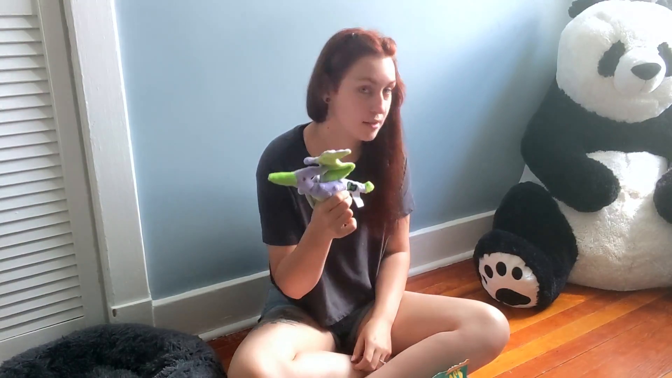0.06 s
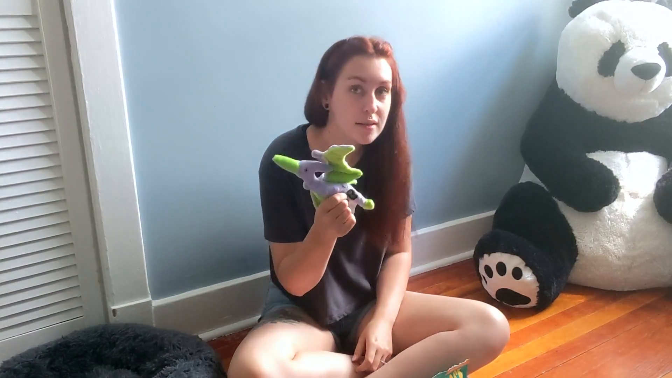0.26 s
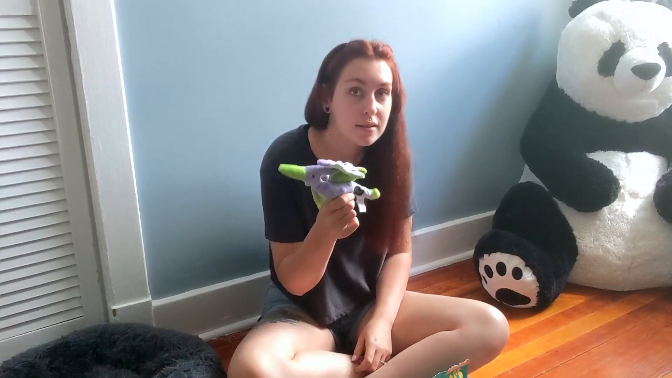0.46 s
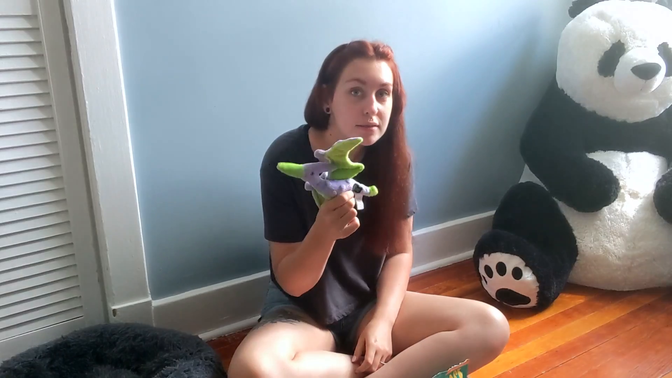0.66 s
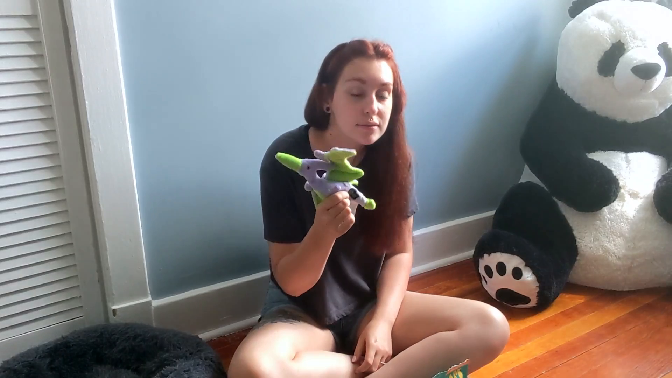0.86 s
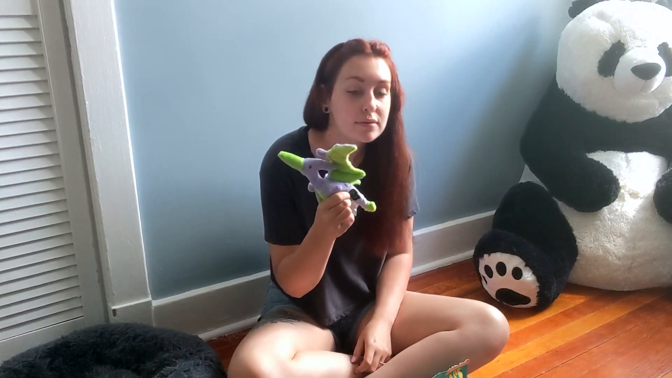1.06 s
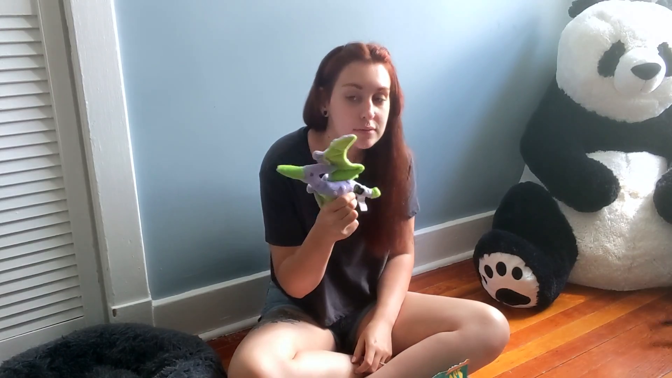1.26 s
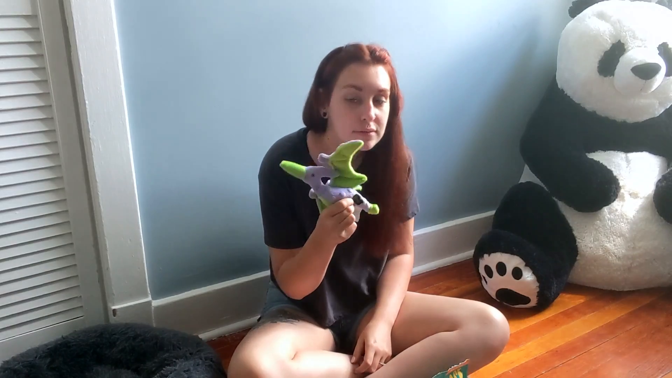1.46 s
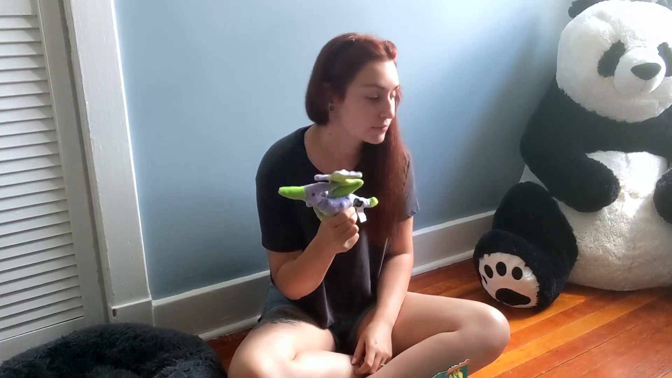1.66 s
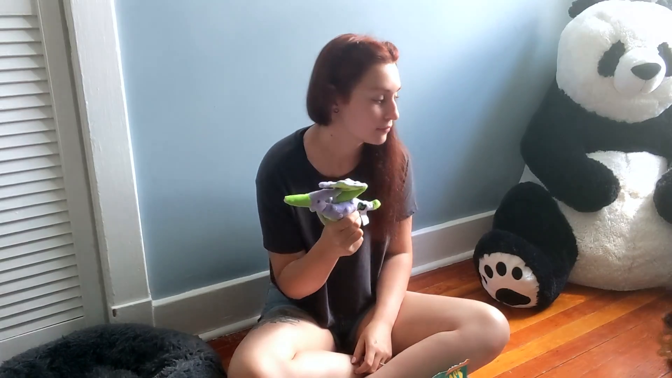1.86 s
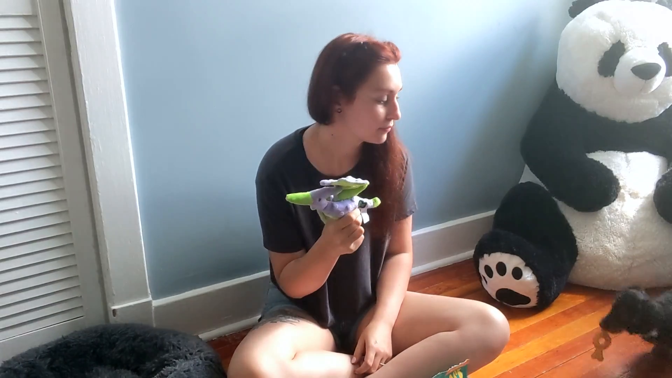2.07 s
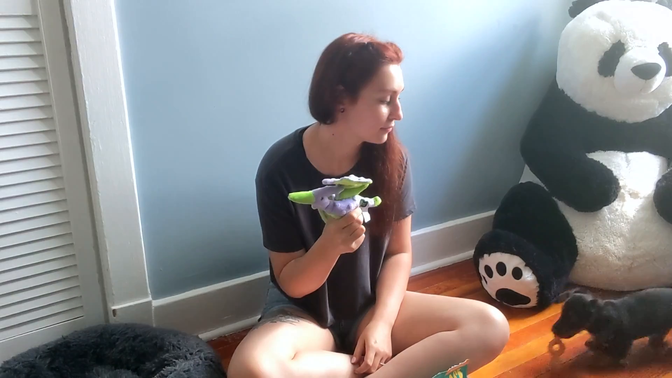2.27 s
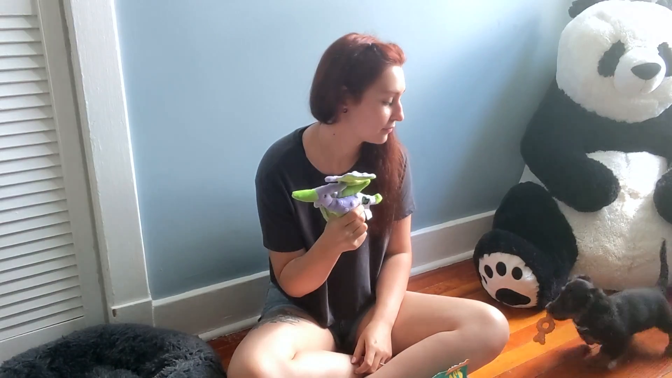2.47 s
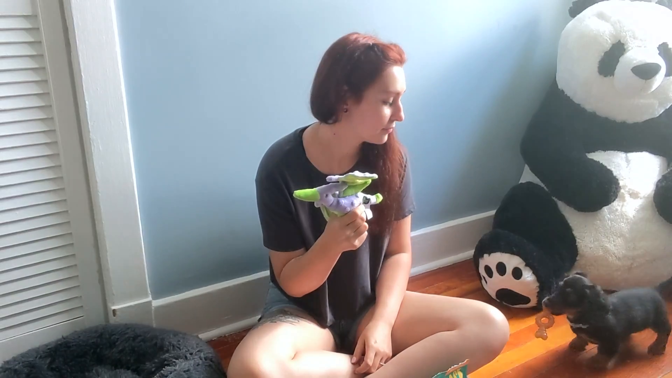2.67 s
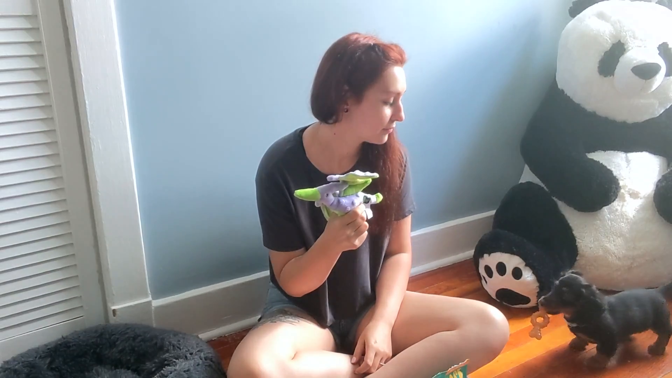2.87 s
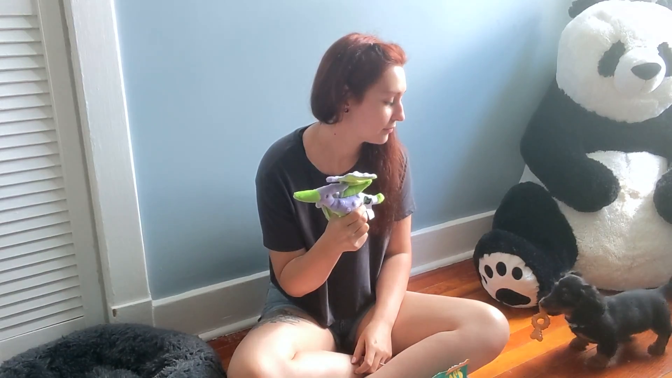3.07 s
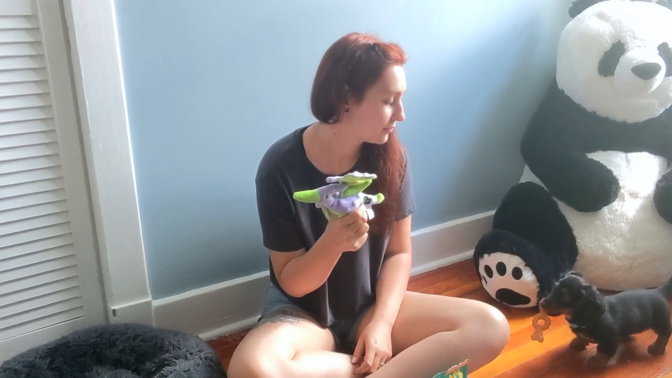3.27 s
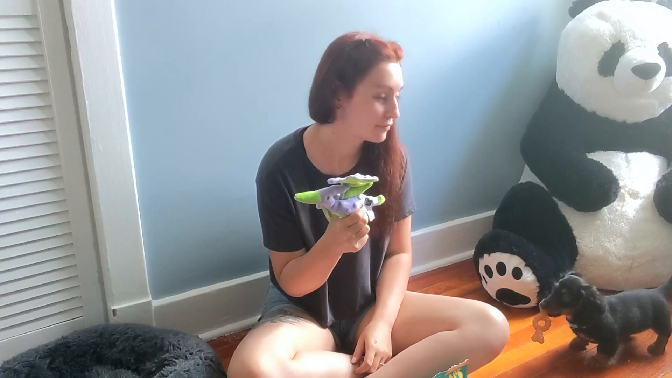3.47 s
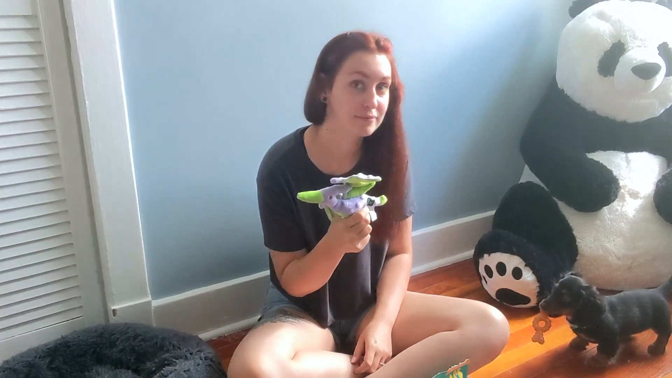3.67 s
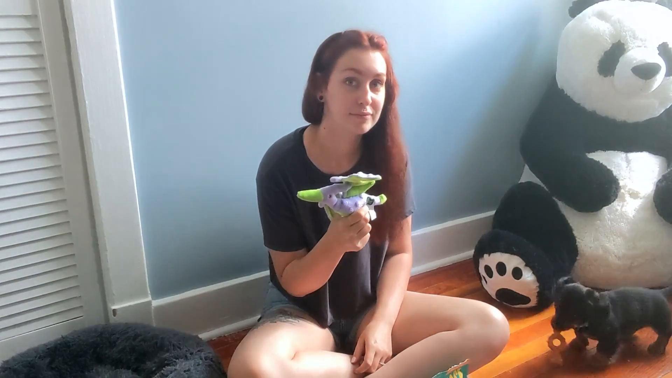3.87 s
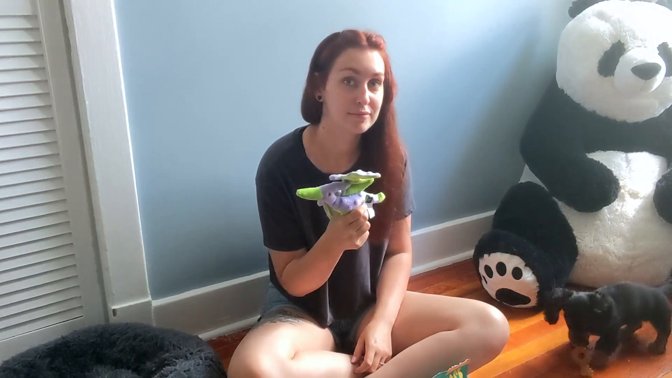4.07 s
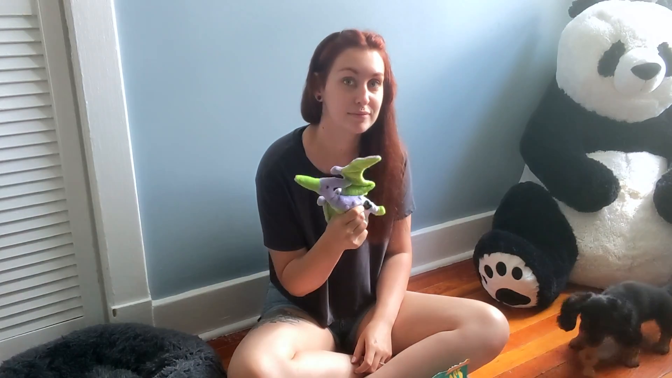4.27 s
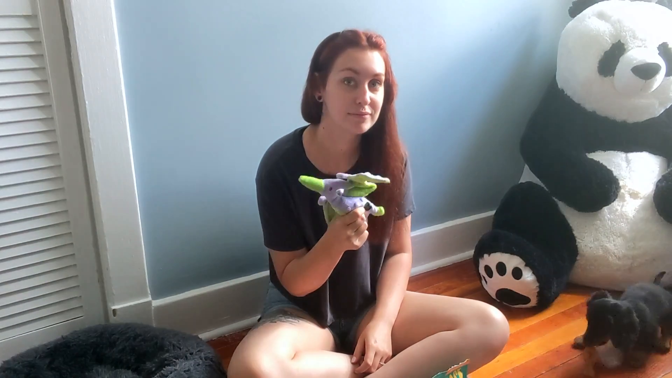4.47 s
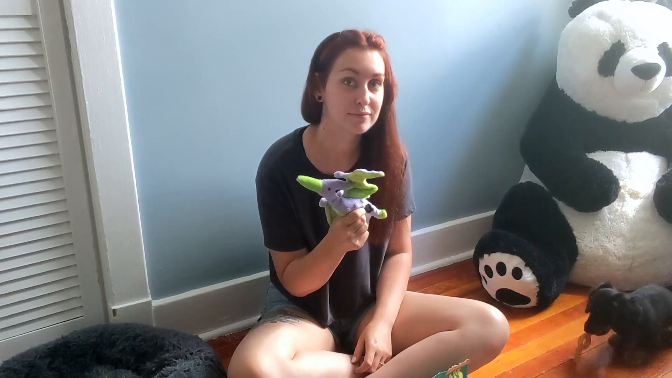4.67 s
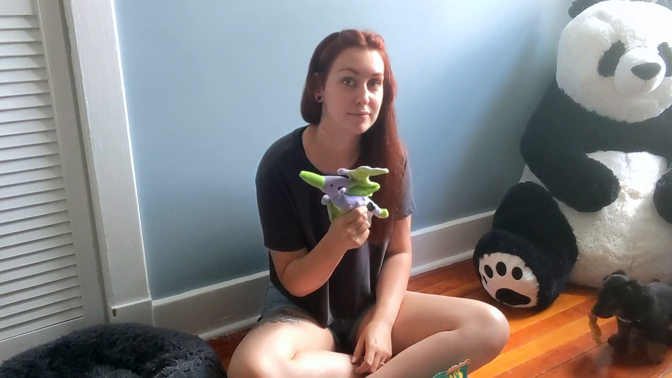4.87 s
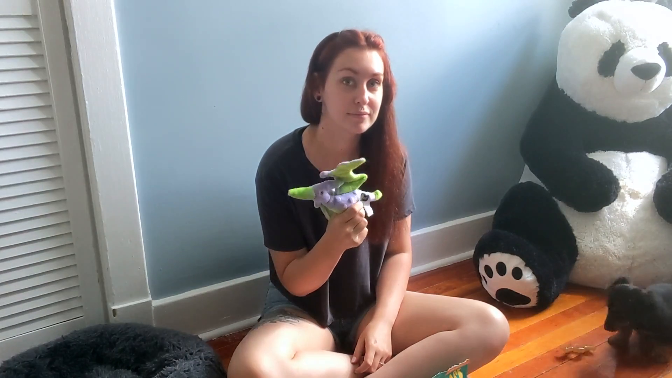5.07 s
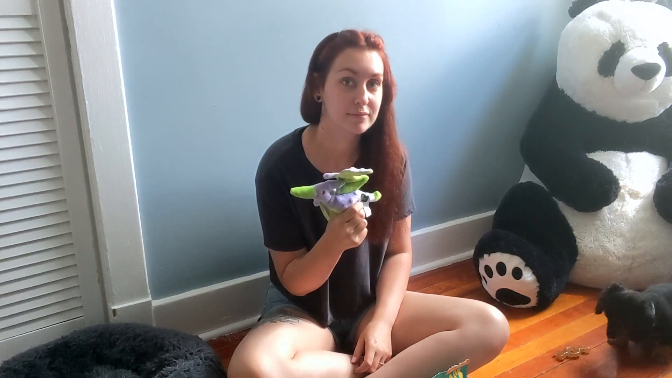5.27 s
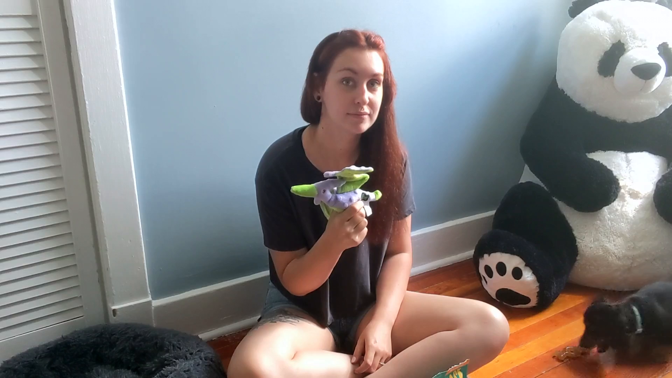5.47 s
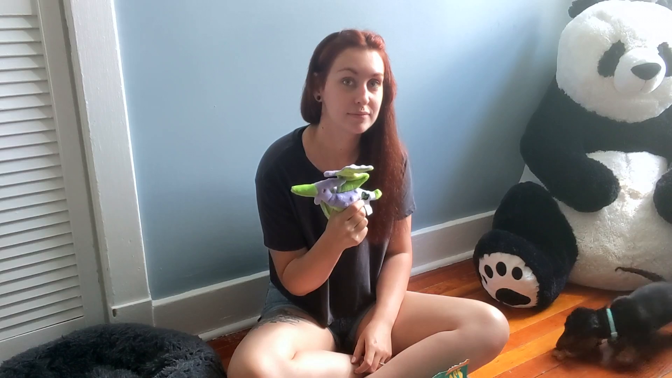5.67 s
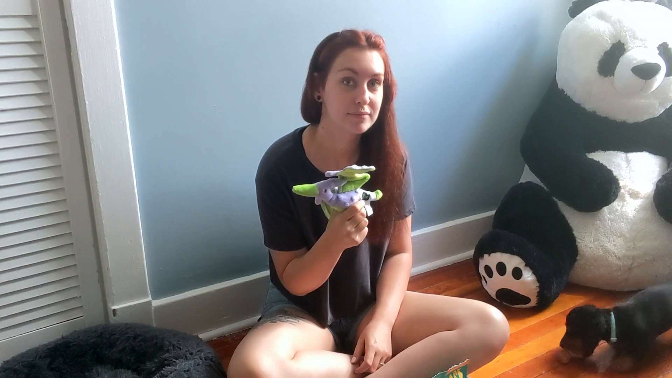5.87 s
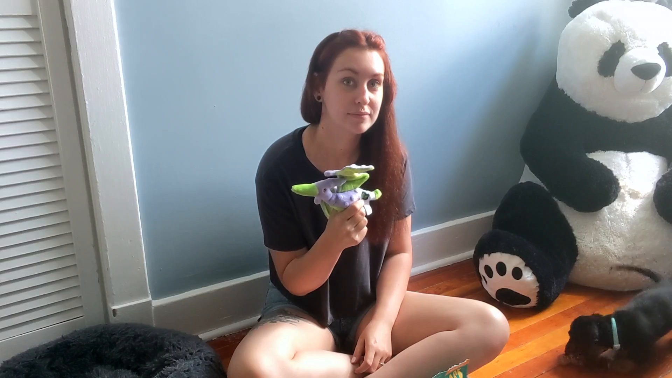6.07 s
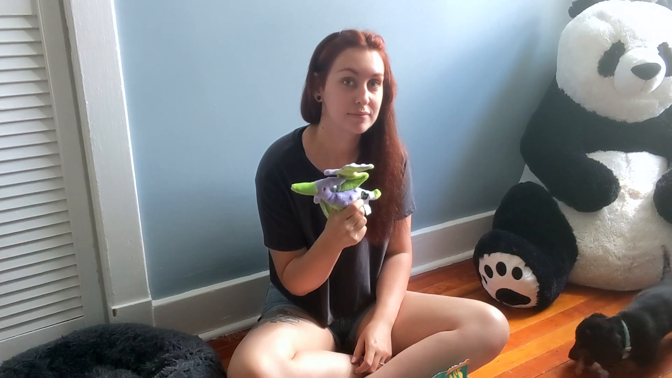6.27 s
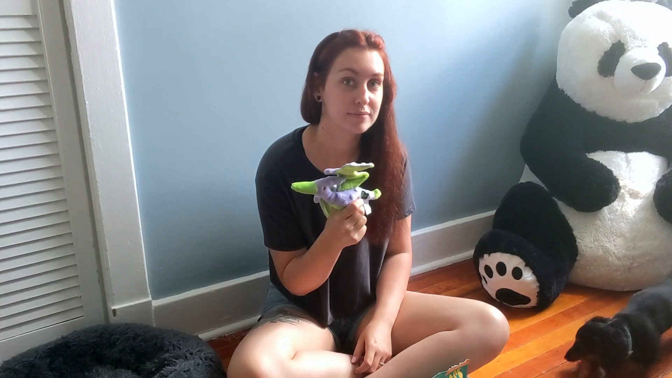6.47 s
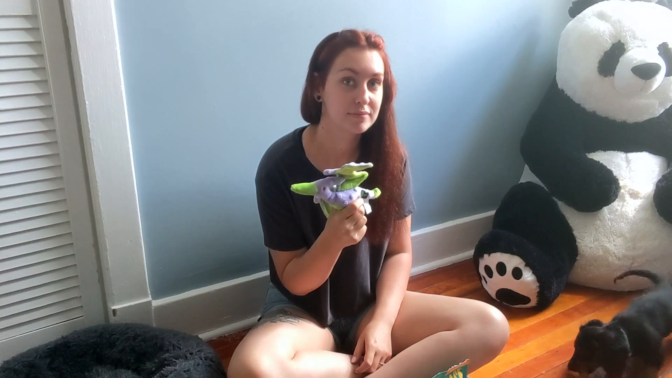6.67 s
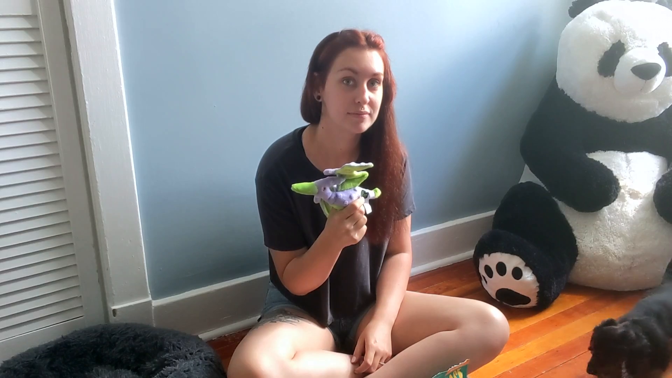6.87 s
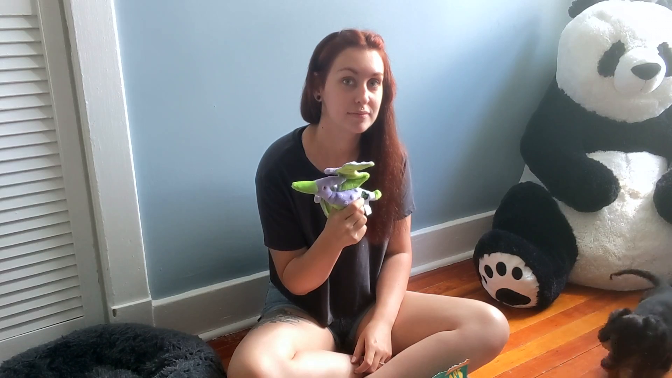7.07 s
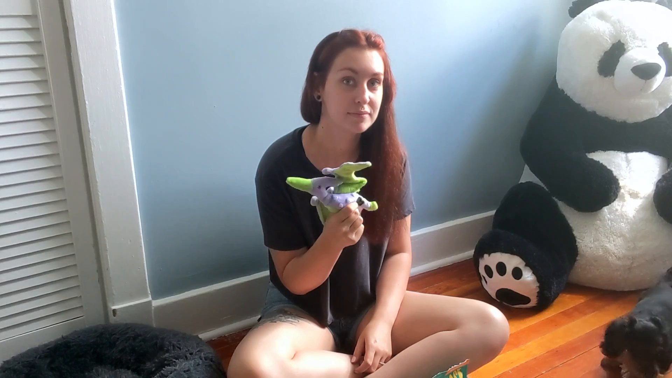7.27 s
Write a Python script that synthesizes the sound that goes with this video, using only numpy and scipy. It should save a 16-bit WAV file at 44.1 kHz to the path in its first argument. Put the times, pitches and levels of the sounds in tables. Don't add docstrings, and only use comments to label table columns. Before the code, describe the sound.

A low, slightly wavering motor drone with soft rumble and hiss fills a small, bare, briefly reverberant bedroom. From 0.2 to 1.6 s a plush toy close to the microphone gives five short, nasal, reedy squeaks about 0.3 s apart, each followed by a quieter, lower refill squeak. At 1.75 s faint puppy paws begin, with soft thumps, claw scuffs and a small metal clink around 2.2 s, then sparse ticks to 2.6 s. Quiet until a soft knock at 4.1 s. Four more squeaks run from 4.2 to 4.9 s, with lower refills between. At 5.0-5.4 s a rubber toy drops: the loudest event, hollow woody booms and hard bouncing knocks, the background briefly ducking. Lighter paw thuds and nudges follow from 5.7 to 6.9 s, with a bright tag clink at 6.6 s. One weak squeak at 7.3 s.

```python
import sys
import numpy as np
from scipy import signal
from scipy.fft import rfft, irfft, next_fast_len
from scipy.io import wavfile
from scipy.ndimage import uniform_filter1d, minimum_filter1d

SR = 44100
rng = np.random.default_rng(int(sys.argv[2]) if len(sys.argv) > 2 else 0)


def materialize(psi):
    bounded = np.clip(np.atleast_2d(psi).T, -1, 1)
    quanta = np.round(bounded * 32767).astype(np.int16)
    wavfile.write(sys.argv[1], SR, quanta)


def natural_amplitude(level_db):
    exponent = np.asarray(level_db, float) / 20
    return 10 ** exponent


N = 322371

# start in seconds, time the pressure is held in seconds,
# reed pitch in Hz at full pressure, pitch in Hz at the end of the hold, level in dB.
SQUEEZES = [
    (.186, .036, 1191, 1235, -25),
    (.504, .041, 1232, 1247, -23),
    (.779, 0.043, 1246, 1236, -23.5),
    (1.046, 0.041, 1202, 1229, -23),
    (1.347, 0.037, 1161, 1123, -24),
    (4.199, 0.039, 1141, 1068, -25),
    (4.444, .034, 1185, 1146, -23.5),
    (4.663, 0.038, 1140, 1073, -25.5),
    (4.891, .037, 1123, 1089, -25.5),
    (7.281, .03, 1070, 1080, -27),
]
# start in seconds, time the suction is held in seconds,
# reed pitch in Hz at full suction, pitch in Hz at the end of the hold, level in dB.
REFILLS = [
    (.369, .039, 902, 878, -33.5),
    (.665, 0.044, 879, 857, -33),
    (.947, 0.037, 887, 867.4, -30.5),
    (1.228, 0.043, 746, 764, -37),
    (1.540, 0.039, 814.4, 843, -30),
    (4.343, 0.032, 863.5, 873, -29.5),
    (4.568, 0.027, 854, 865.6, -31.5),
    (4.803, .032, 859, 874.6, -30),
]
# first pitch in Hz, first level in dB, rise in seconds, level change over the hold in dB,
# sag in seconds, pitch share and level in dB after the sag, pitch share and seconds of the collapse.
SQUEEZE_SHAPE = (1065, 1.5, .014, -3.5, .024, .8, -7, .7, .011)
REFILL_SHAPE = (915, -5, 0.0042, 2, .021, .8, -7, .75, .011)
# frequency in Hz, level in dB.
SQUEEZE_COLOUR = [
    [(530, -30.5), (900, -4), (1260, -4.5), (1760, -3), (2530, -6.5), (2960, -7), (3760, -12.5),
     (4090, -6.5), (4840, -8), (7920, -8), (9950, 1.5), (12200, -20), (15900, -22)],
    [(530, -34), (900, -9.5), (1140, -1.5), (1470, -3.5), (2220, -7), (2780, -5), (3220, -8.5), (5140, -9),
     (6460, -6), (7110, -10), (9830, 1.5), (13000, -24), (15900, -22)],
]
REFILL_COLOUR = [
    [(410, -32), (700, -3), (1680, 4), (2550, -1.5), (3630, -7.5), (4420, -7.5), (5660, -11.5),
     (7550, -19.5), (9310, 2), (9930, 2), (11800, -8.5), (14700, -22), (15900, -45)],
    [(410, -32), (700, -13), (1790, -3), (2690, -15), (3630, -19.5), (4660, -23), (5310, -21), (6980, -35),
     (9680, -8.5), (12200, -25), (12900, -32.5), (14900, -28), (15900, -88)],
]
# start in seconds, peak in dB,
# pitch of the boom in Hz.
PAWS = [(1.748, -27, 210), (2, -34, 160), (2.159, -28.5, 156), (2.186, -26, 170), (2.222, -36, 155),
        (2.24, -30.5, 380), (4.139, -30.5, 144), (5.102, -5, 250), (5.117, -3.5, 237), (5.175, -23, 251),
        (5.332, -15, 204), (5.666, -24.5, 239), (5.683, -21, 270), (5.79, -41, 185), (6.014, -15, 203),
        (6.18, -19.5, 221), (6.358, -29, 207), (6.571, -23, 315), (6.639, -33, 151), (6.88, -36.5, 199)]
# start in seconds, peak in dB,
# hard knock in dB over that peak, pitch of the boom in Hz.
BOUNCES = [(4.115, -29.5, -11.5, 242), (5.011, -5.5, -18, 259), (5.039, -12.5, -22, 232),
           (5.099, -1, -11, 640), (5.153, -17, -5, 262), (5.218, -25, -9, 222), (5.251, -28, -5, 490),
           (5.257, -14, -10, 322), (5.314, -12.5, -10.5, 424), (5.362, -23.5, -30, 238),
           (5.723, -28.5, -13, 500), (5.758, -27, -20, 185), (5.847, -45, -20, 235), (6.0, -14, -9.5, 260),
           (6.058, -17, -5.5, 300), (6.088, -20, -8, 248), (6.219, -26, -15, 225), (6.283, -23, -11, 340),
           (6.535, -24.5, -8, 234), (6.608, -27.5, -12, 241)]
# frequency in Hz, level in dB.
KNOCK_COLOUR = [(320, -26.5), (550, 1), (651, 4.5), (771, 0.5), (1740, -9), (4000, -30), (7980, -46),
                (9850, -45), (15900, -104)]
# frequency in Hz, level in dB, 60 dB decay in seconds.
JOISTS = [(150.7, -2.5, 0.51), (237.6, 4, 0.25)]
# start in
# seconds, peak in dB, low and high edge in Hz, length in seconds.
SCUFFS = [(1.741, -60, 5000, 15500, .15), (1.947, -54.5, 9530, 14300, .004),
          (1.995, -44, 4460, 13000, 0.0095), (2.007, -47, 3570, 9400, 0.019),
          (2.135, -42.5, 1263, 16000, .015), (2.204, -47.5, 4900, 16000, .01),
          (2.223, -35.5, 390, 7200, 0.0048), (2.258, -42.5, 4960, 13900, 0.025),
          (2.478, -46, 1920, 16000, .012), (2.63, -51.5, 2460, 15700, 0.0084),
          (3.783, -49.5, 6450, 10980, 0.00067), (5.09, -33, 2450, 12040, 0.022),
          (5.098, -23.5, 900, 5470, 0.0016), (5.254, -43, 1497, 6000, 0.00089),
          (5.312, -44, 1004, 5960, 0.00076), (5.609, -52, 3700, 15000, 0.014),
          (5.791, -49, 2460, 12000, 0.0089), (6, -56, 2500, 11000, 0.01), (6.067, -62, 4000, 13000, .025),
          (6.162, -57, 3930, 11300, 0.011), (6.335, -49, 6500, 11500, 0.00067),
          (6.495, -58, 4000, 10000, 0.0068), (6.53, -53, 2880, 8540, .01),
          (6.594, -55.5, 5340, 9700, 0.0099)]
# start in seconds, peak in dB.
CLINKS = [
    (2.21, -28),
    (6.5321, -64),
    (6.5985, -23.5),
]
# frequency in Hz, level in dB, 60 dB decay in seconds.
TAG_MODES = [(5600, 10, 0.025), (5650, 2, .04), (6300, -7, 0.032), (6180, 9, 0.036), (7600, -4, 0.053),
             (8800, -27, 0.037)]
# delay after the straight path in seconds, level in dB.
ECHOES = [(.0024, -7.5), (.0052, -3), (.0087, -13.5)]
# frequency in Hz, 60 dB decay in seconds.
ROOM_T60 = [(125, 0.27), (500, 0.26), (1200, 0.2), (2500, 0.28), (5000, 0.23), (9500, 0.23), (14000, 0.15)]
# frequency in Hz, left minus right in dB.
TOY_BALANCE = [(60, -15.5), (110, -29.5), (200, -22), (380, 2.5), (700, 5), (1290, -3), (2380, -2.5),
               (4400, -1.5), (8120, -10.5), (15000, 7)]
FLOOR_BALANCE = [(60, 1), (110, 0), (200, 1), (380, 1.5), (700, -1), (1290, -0.5), (2380, 0), (4400, -3),
                 (8120, -7), (15000, 5.5)]
# frequency in Hz, level in dB rms.
DRONE = [(59.2, -44), (145.3, -57), (360.7, -64), (409.1, -69.5)]
# frequency in Hz, level in dB per Hz.
AIR_COLOUR = [(41, -22.5), (70, -11.5), (103, -13.5), (155, -8), (313, -19), (367, -21), (605, -26),
              (759, -25.5), (1170, -30.5), (1720, -31), (2010, -35), (4670, -40), (8420, -47.5),
              (14200, -43.5), (15900, -47.5)]
# frequency in Hz, left-right likeness from -1 to 1.
AIR_ALIKE = [(60, 0.78), (130, 0.89), (290, 0.8), (640, 0.18), (1410, -0.28), (3100, 0.073), (6820, 0.017),
             (15000, -0.1)]
# frequency in Hz, left minus right in dB.
AIR_BALANCE = [(60, -3.5), (110, -7.5), (200, -1), (380, -3.5), (700, 3.5), (1290, -1.0), (2380, -2),
               (4400, -1.5), (8120, -7.5), (15000, 14.5)]

T = np.arange(N) / SR
PAD = next_fast_len(N + 4096)
HZ = np.maximum(np.arange(PAD // 2 + 1) * SR / PAD, 1)
LEFT_RIGHT = np.array([[1], [-1]])
STEP = 16


def squeaker(squeaks, colours, shape):
    out = np.zeros(N)
    for squeak in squeaks:
        s, hz, db = pressure(squeak, shape)
        tone = colours[int(3 < s[0] < 6)]
        t = s[0] + T[:int((s[-1] - s[0]) * SR)]
        age = t - s[0]
        ragged = np.clip(age / 0.01, .1, 1)

        waver = smooth_noise(SR // 8, 90, 1)[:len(t)]
        hz = uniform_filter1d(np.interp(t, s, hz), 132)
        hz = hz * (1 + .007 * ragged * waver)
        flutter = natural_amplitude(2 * ragged * smooth_noise(SR // 8, 150, 2)[:len(t)])

        order = np.arange(1, 25)[:, None]
        dull_db = -6 * np.log2(order) * np.exp(-age / 0.003)
        sizes = natural_amplitude(read(tone, order * hz) + dull_db) * (order * hz < 16000)
        phase = order * 2 * np.pi * np.cumsum(hz) / SR + 0.5 * order ** 1.61
        puffs = unit(np.sum(sizes * np.cos(phase), axis=0))

        hiss = signal.fftconvolve(rng.standard_normal(SR // 8), causal(tone))
        leak = natural_amplitude(-15) * ragged * unit(band(hiss, 2950, 24000))[:len(t)]
        edge = np.clip(np.minimum(age / 0.0019, (s[-1] - t) / 0.0082), 0, 1)
        add(out, s[0], (puffs * flutter + leak) * edge * natural_amplitude(np.interp(t, s, db)))
    return out


def pressure(squeak, shape):
    s, hold_s, full_hz, end_hz, db = squeak
    first_hz, first_db, rise_s, hold_db, sag_s, sag, sag_db, collapse, collapse_s = shape
    times = s + np.cumsum([0, rise_s, hold_s - rise_s, sag_s, collapse_s])
    hz = [first_hz, full_hz, end_hz, end_hz * sag, end_hz * sag * collapse]
    return times, hz, db + np.array([first_db, 0, hold_db, sag_db, sag_db - 42.0])


def thumps():
    boom, knock = np.zeros(N), np.zeros(N)
    paws = [(s, db, -35, hz, 2.54 / hz) for s, db, hz in PAWS]
    bounces = [(s, db, hard_db, hz, 3.75 / hz) for s, db, hard_db, hz in BOUNCES]
    for s, db, hard_db, hz, contact_s in paws + bounces:
        board = band(burst(contact_s, 0), hz / 1.36, hz * 1.226)
        board *= np.sqrt(contact_s * SR / 2 / np.sum(board ** 2))
        add(boom, s + 0.00082, natural_amplitude(db - 7) * board)
        clatter = burst(0.5 * contact_s, 2.6)
        crack = natural_amplitude(4.5) * burst(0.00093, 0)
        add(knock, s + 0.000997, natural_amplitude(db + hard_db) * (clatter + crack))
    floor = natural_amplitude(-48.0) * signal.fftconvolve(boom, ring(JOISTS))[:N]
    return boom + floor + natural_amplitude(14.0) * signal.fftconvolve(knock, causal(KNOCK_COLOUR))[:N]


def scuffs():
    out = np.zeros(N)
    for s, db, low_hz, high_hz, length_s in SCUFFS:
        add(out, s, natural_amplitude(db) * band(burst(length_s, 1.15), low_hz, high_hz))
    return out


def tag():
    out = np.zeros(N)
    for s, db in CLINKS:
        add(out, s, natural_amplitude(db - 9.5) * ring(TAG_MODES))
    return out


def burst(length_s, grit_db):
    t = T[:SR // 4]
    grit = natural_amplitude(grit_db * rng.exponential(size=len(t)))
    return unit(rng.standard_normal(len(t)) * grit) * np.exp(-t / max(length_s, .0005))


def ring(modes):
    t = T[:SR // 2]
    body = sum(natural_amplitude(db - 60 * t / t60) * np.sin(2 * np.pi * hz * t) for hz, db, t60 in modes)
    return body / np.abs(body).max()


def room(x, echoes, wet_db, gap_s, left_lag_s):
    t, tail = T[:SR // 2], 0
    for hz in 90 * 2 ** np.arange(0, 7.6, .5):
        mid, side = band(rng.standard_normal((2, len(t))), hz / 1.19, hz * 1.19) * np.sqrt(hz)
        apart = min(hz / 1200, 1)
        tail = tail + (mid + apart * side * LEFT_RIGHT) * fade(t / read(ROOM_T60, hz))
    tail = tail * np.clip(t / gap_s - 1, 0, 1)
    tail *= natural_amplitude(wet_db) / np.sqrt(np.sum(tail ** 2) / 2)

    skew = left_lag_s * LEFT_RIGHT / 2
    paths = 0
    for k, (s, db) in enumerate([(0.00018, 0)] + echoes):
        delay = s + (-1) ** k * skew
        paths = paths + natural_amplitude(db) * np.exp(-2j * np.pi * HZ * delay)
    return colour(x, paths) + signal.fftconvolve(x[None], tail, axes=1)[:, :N]


def fade(share):
    return natural_amplitude(-60 * share) + natural_amplitude(-30 - 18 * share)


def ports(x, balance):
    return colour(x, natural_amplitude(LEFT_RIGHT * read(balance, HZ) / 2))


def background():
    waver = smooth_noise(N, 3000, 2)
    drone = 0
    for hz, db in DRONE:
        phase = 2 * np.pi * np.cumsum(hz * (1 + 0.00872 * waver)) / SR
        drone = drone + natural_amplitude(db + 1.5 + .6 * waver) * np.sin(phase)
    alike = np.clip(read(AIR_ALIKE, HZ), -1, 1)
    mid, side = rng.standard_normal((2, N))
    air = colour(mid, np.sqrt(1 + alike)) + LEFT_RIGHT * colour(side, np.sqrt(1 - alike))
    air = unit(colour(air, natural_amplitude(read(AIR_COLOUR, HZ)))) * natural_amplitude(-48.5)
    return ports(air + drone, AIR_BALANCE)


def read(table, hz):
    table_hz, value = np.array(table).T
    return np.interp(np.log(hz), np.log(table_hz), value)


def colour(x, gain):
    return irfft(rfft(x, PAD) * gain, PAD)[..., :N]


def causal(table):
    hz = np.maximum(np.arange(1025) * SR / 2048, 1)
    cepstrum = irfft(np.log(natural_amplitude(read(table, hz))))
    cepstrum[1:1024] *= 2
    cepstrum[1025:] = 0
    return irfft(np.exp(rfft(cepstrum)))


def band(x, low_hz, high_hz):
    low_hz, high_hz = np.sort(np.clip([low_hz, high_hz], 40, 20000))
    sos = signal.butter(2, [low_hz, high_hz + 1], "band", fs=SR, output="sos")
    return signal.sosfilt(sos, x) * np.sqrt(SR / 2 / (high_hz + 1 - low_hz))


def smooth_noise(length, width, passes):
    x = rng.standard_normal(length)
    for _ in range(passes):
        x = uniform_filter1d(x, width)
    return unit(x)


def unit(x):
    return x / np.sqrt(np.mean(x ** 2))


def add(out, s, x):
    i = int(s * SR)
    out[i:i + len(x)] += x[:N - i]


def scene():
    toy = squeaker(SQUEEZES, SQUEEZE_COLOUR, SQUEEZE_SHAPE) + squeaker(REFILLS, REFILL_COLOUR, REFILL_SHAPE)
    puppy = thumps() + scuffs() + tag()
    toy = ports(natural_amplitude(3) * room(toy, ECHOES, 4.08, 0.0013, -0.000071), TOY_BALANCE)
    puppy = ports(room(puppy, [], 1.0, 0.0026, -0.000088), FLOOR_BALANCE)
    return toy + puppy + background()


def follow(x, start, attack_s, release_s):
    e, out = start, []
    for v in x.tolist():
        e += (v - e) * STEP / SR / (attack_s if v > e else release_s)
        out.append(e)
    return np.array(out)


def low_pass(x):
    return signal.sosfilt(signal.butter(12, 15800, fs=SR, output="sos"), x)


def record(dry):
    hold = int(.16 * SR / STEP)
    peak = follow(np.abs(dry).max(axis=0)[::STEP], natural_amplitude(-50.5), 0.034, 0.013)
    held = -minimum_filter1d(-peak, hold, origin=(hold - 1) // 2)
    loud = np.interp(T, T[::STEP], follow(held, natural_amplitude(-50), .0044, .15))
    gain = np.minimum(natural_amplitude(-34.0) / loud, 1) ** 0.3
    treble_limit = signal.ellip(8, .2, 70, 15800, fs=SR, output="sos")
    return low_pass(signal.sosfilt(treble_limit, dry) * gain)


dry = scene()
out = record(dry)
materialize(out)
```